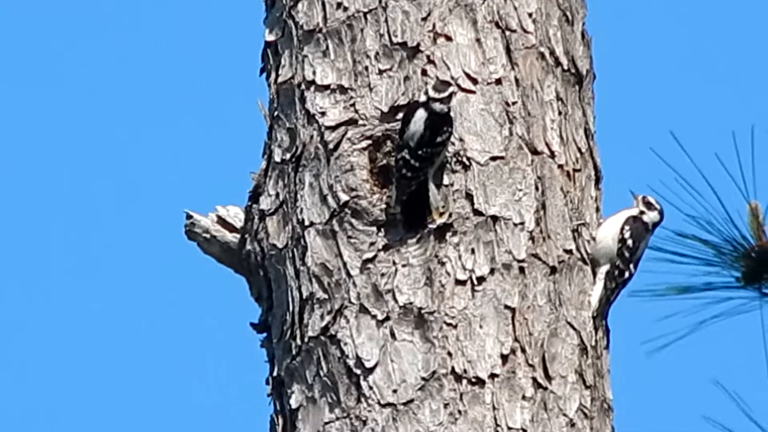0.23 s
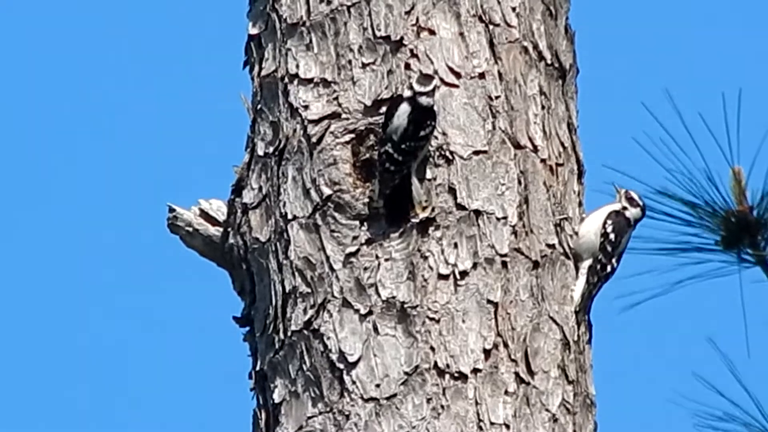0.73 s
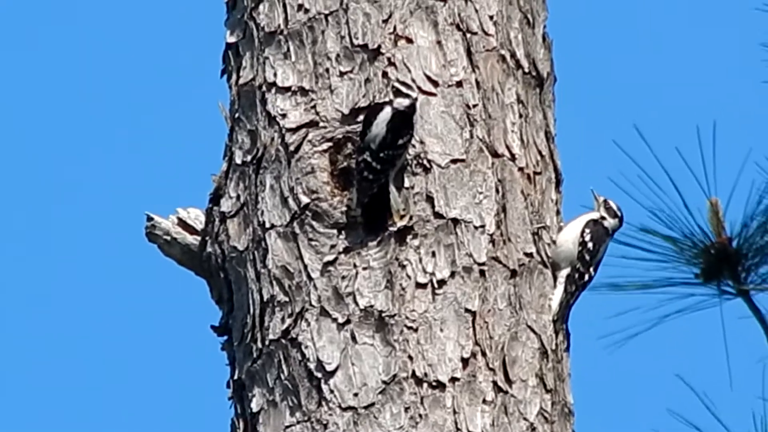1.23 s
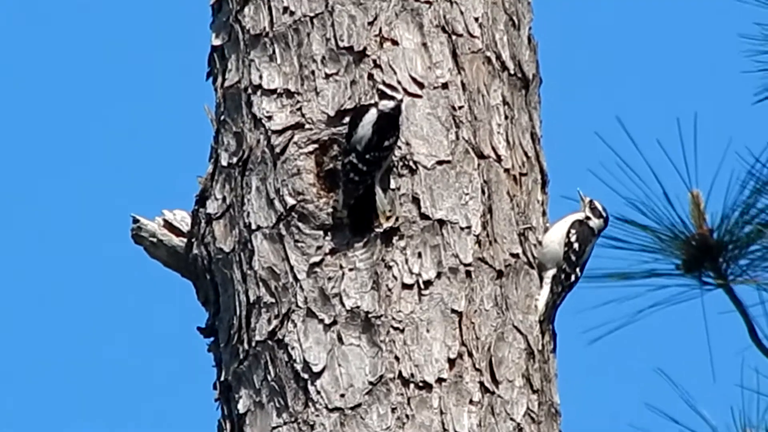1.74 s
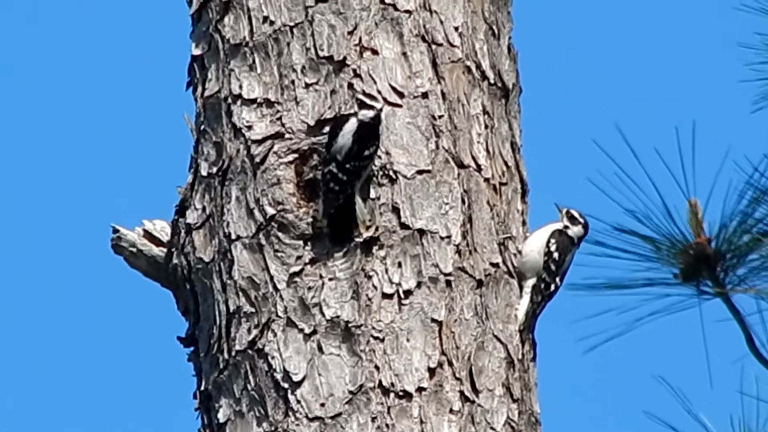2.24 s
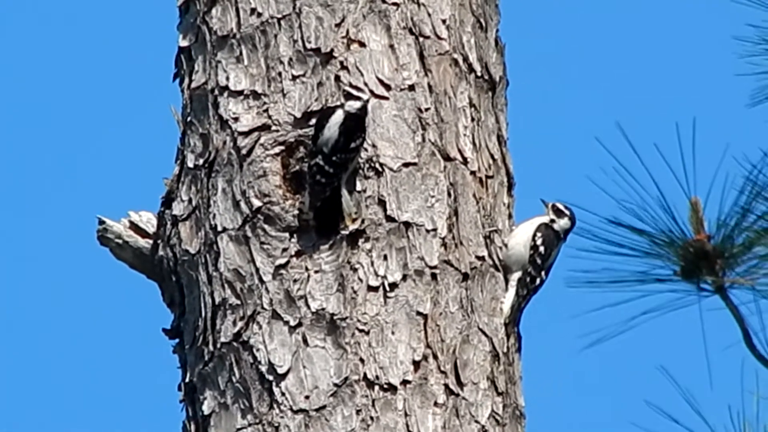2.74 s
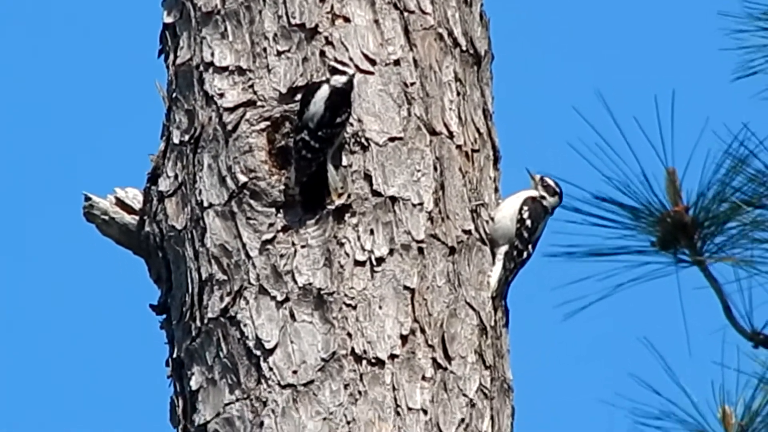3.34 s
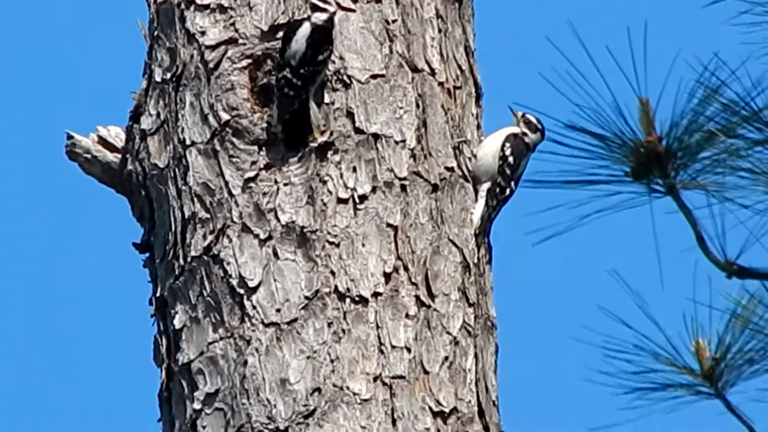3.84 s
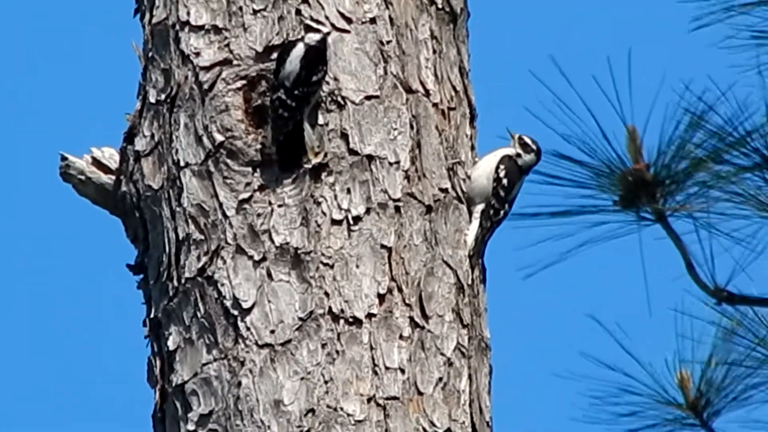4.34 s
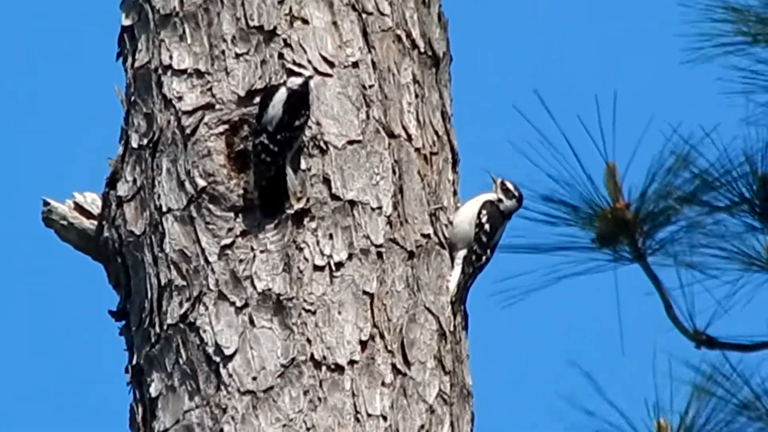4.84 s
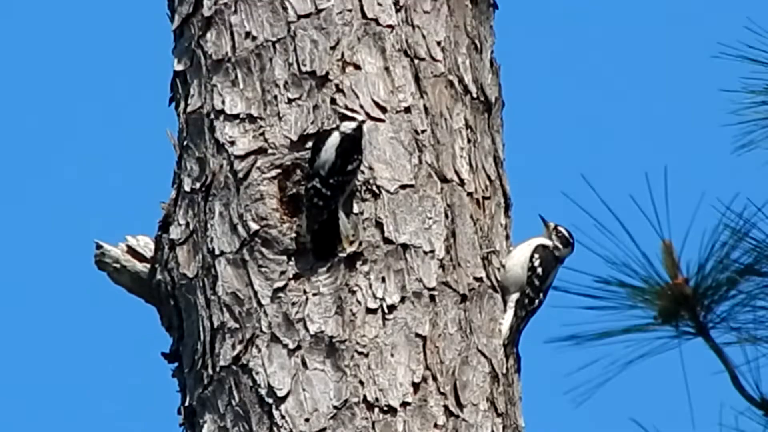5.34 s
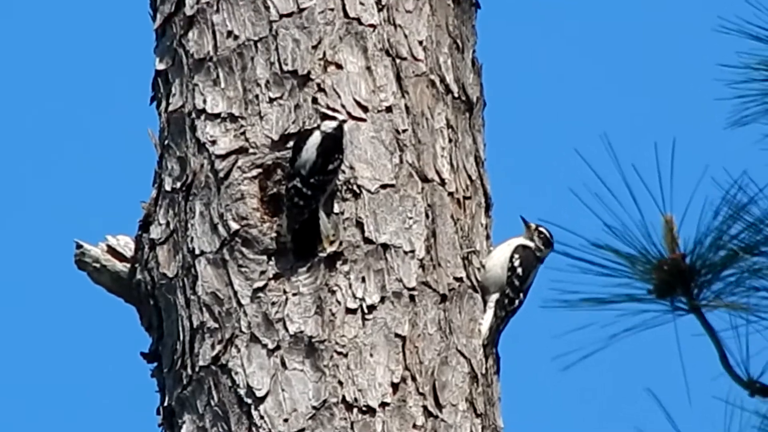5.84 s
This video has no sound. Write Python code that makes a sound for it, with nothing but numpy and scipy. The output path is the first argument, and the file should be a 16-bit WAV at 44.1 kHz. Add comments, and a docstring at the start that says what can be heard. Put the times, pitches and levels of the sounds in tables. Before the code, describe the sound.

Outdoors in a pine wood, a songbird sings three clear, steeply falling whistles about a second apart, then a quick, regular run of fourteen sharp descending chips. Fainter birds twitter and burr farther away, and a nearer one gives a brief two-note call after the run. Soft traffic rumble lies beneath, while low wind gusts thump the stereo microphone mostly on the left and leaves rustle faintly on the right.

```python
"""A songbird sings three falling whistles and a run of fast chips: gliding sines with weak overtones.
A second bird gives a two-note call; a far bird repeats a phrase, others give burry notes, and thin faint
whistles sound between, some of them echoes of the songbird's whistles. Dying noise tails scatter it all
through a pine wood. Lumpy low noise and short pulses are gusts at the microphone ports; grainy bright
noise is leaves on the right, with ticking twigs. A flickering noise bed is far traffic and far leaves."""
import sys
import numpy as np
from scipy import signal
from scipy.io import wavfile
from scipy.ndimage import uniform_filter1d

SR = 44100
rng = np.random.default_rng(int(sys.argv[2]) if len(sys.argv) > 2 else 0)


def transcribe(u):
    """Save the signal u as a 16-bit wav file named by the first command-line argument.

    u: samples, shape (n,) or (channels, n), limited to [-1, 1]; the rate is SR.
    q: integer samples, one column per channel.
    """
    v = np.clip(np.atleast_2d(u).T, -1, 1)
    q = np.round(v * 32767).astype(np.int16)
    wavfile.write(sys.argv[1], SR, q)


N = 267819

# The songbird. Pan is left minus right throughout.
# whistle contour: steep flick, shelf, loud drop, sagging tail [t/s from the drop, f/Hz, level/dB re top]
WHISTLE_SHAPE = [(-.187, 7800, -40), (-.182, 6400, -20), (-.177, 4400, -17), (-.17, 4040, -15.5),
                 (-.15, 3580, -10.5), (-.13, 3430, -5.5), (-.1, 3340, -15), (-.05, 3290, -10),
                 (-.03, 3220, -6), (.008, 2740, 0), (.035, 2310, -9), (.062, 2060, -12), (.11, 1960, -9),
                 (.2, 1790, -12.5), (.295, 1592, -16), (.32, 1540, -31)]
# each whistle [t/s of the drop, tail length factor, top level/dB, tail boost/dB, overtone boost/dB]
WHISTLES = [(.808, 1.3, -46, 1.5, -14), (1.732, 1.2, -38, -2.5, -3), (2.451, 1.04, -37.5, 1.5, -1)]
# chip contour [t/s from its mark, f/Hz, level/dB re top]
CHIP_SHAPE = [(-.005, 8720, -21), (-.0035, 8630, -18.5), (0, 6660, -17), (.003, 4980, -13.5),
              (.006, 4408, -25), (.012, 4214, -18.5), (.019, 4043, -26), (.023, 3854, -10.5),
              (.031, 3585, -4), (.039, 3258, -4), (.044, 2730, -4.5), (.048, 2162, -8), (.054, 1800, -14),
              (.061, 1597, -14.5), (.066, 1500, -33)]
# each chip [t/s of the mark, head length factor, top level/dB, pan/dB]
CHIPS = [(2.916, 0.95, -40, -2.0), (3.052, 0.91, -41, -2.7), (3.189, 0.94, -40, -1), (3.327, 0.98, -40, -2),
         (3.465, 0.97, -39.5, 3), (3.607, 0.84, -39.5, -2), (3.752, 0.88, -38, -3),
         (3.893, 0.83, -39, -3.5), (4.029, 0.92, -39, -3), (4.173, 0.94, -38.5, -4),
         (4.31, 0.97, -38, -3.5), (4.451, 0.99, -37, -2), (4.595, 0.94, -38, -3), (4.739, 0.98, -39.5, -5)]
# overtones the throat lets through [f/Hz, level/dB re fundamental]
THROAT = [(7000, -64), (7500, -25), (8100, -14.5), (8700, -24), (9300, -60), (11300, -54), (12100, -25),
          (13000, -59)]
# whistle pan by pitch [f/Hz, pan/dB]
WHISTLE_PAN = [(1600, 3), (2700, -4.5), (3500, -2.5), (8000, -18)]
TAIL_S, HEAD_S = .15, .035   # whistles stretch after this moment, chips before this one
THIRD_DB = -10.5   # the third multiple is weaker than the throat alone would make it
FLICK_SPREAD_DB = 3   # the flick above 4.5 kHz differs from chip to chip

# nearer bird's call, rising then falling note [t/s, f/Hz, level/dB before a fixed gain of 0.96]
CALL_RISE = [(5.255, 2270, -59), (5.285, 2200, -63), (5.295, 2116, -55), (5.315, 2400, -54),
             (5.335, 2600, -53), (5.352, 2676, -41.5), (5.366, 2790, -53.5), (5.378, 2844, -40),
             (5.384, 3770, -46), (5.389, 4930, -50)]
CALL_FALL = [(5.383, 3110, -54), (5.394, 2383, -54), (5.409, 2230, -43), (5.418, 2120, -55),
             (5.424, 1910, -60)]
# its overtones [f/Hz, level/dB re fundamental]
CALL_OVERTONES = [(4000, -18), (4600, -14), (5200, -22), (5700, -31), (7200, -30), (7900, -25), (8800, -26),
                  (9500, -60)]

# far bird's three-note phrase [t/s in phrase, length/s, start f/Hz, end f/Hz, level/dB re phrase]
PHRASE = [(0, .024, 3800, 2600, -5.5), (.042, .016, 2500, 3200, -1), (0.056, .02, 2550, 2950, -6)]
# each time it is sung [t/s, level/dB]
PHRASE_REPEATS = [(.288, -57), (.433, -54), (.583, -53), (.733, -54), (.883, -54)]
# thin faint whistles, some of them echoes of the songbird's whistles
# [t/s, length/s, start f/Hz, end f/Hz, level/dB, pan/dB]
FAINT_WHISTLES = [(1.173, 0.056, 3030, 2620, -64, 1), (1.22, 0.082, 2470, 2210, -64.5, -13),
                  (2.145, 0.15, 3340, 3300, -75, 0.1), (2.58, 0.039, 3405, 3350, -61, 7),
                  (2.662, 0.043, 3370, 3270, -63, 3), (5.073, .04, 1984, 2080, -67, -14),
                  (5.816, 0.047, 1924, 2080, -60, -9)]
# burry far notes, strings of tiny falling chirps [t/s, length/s, start f/Hz, end f/Hz, level/dB, pan/dB]
BURRY_NOTES = [(1.393, 0.049, 2540, 2080, -55, 3), (1.487, 0.036, 3400, 3070, -64, 9),
               (1.524, 0.043, 2550, 2030, -56, 3), (1.655, 0.05, 2520, 2010, -56.5, 6),
               (1.974, 0.054, 2550, 2345, -59, 2), (2.318, 0.063, 2620, 2080, -58, 7),
               (5.151, 0.087, 3040, 2520, -64.5, 14), (5.698, .09, 3090, 2800, -67, 11),
               (5.92, 0.07, 3050, 2660, -63.5, 15)]
BURR_S, BURR_HZ = 0.018, 252   # chirp spacing, half the sweep of one chirp

# scatter: decay time, level
BRANCH_T60_S, BRANCH_DB = 0.078, -3.5
WOOD_T60_S, WOOD_DB = .3, -9
FAR_T60_S, FAR_DB = 1.45, -8
FAINT_WET_DB = 5   # extra send of far birds and faint whistles into the scatter

# slow rise and fall of wind at the ports [t/s, left level/dB, right level/dB]
WIND_RISE_AND_FALL = [(0.09, -56, -66), (0.6, -53, -47), (1.2, -69, -68), (2.1, -56, -60), (2.45, -48, -42),
                      (2.9, -33, -46), (3.25, -33.5, -40), (3.6, -32.5, -36), (4.0, -26, -41),
                      (4.15, -49, -46), (4.5, -43.5, -54), (4.8, -43.5, -56), (5.0, -62, -65),
                      (5.6, -99, -70), (6.07, -46, -56)]
# buffets on top of it [t/s, half-length/s, peak level/dB, pan/dB]
BUFFETS = [(0.771, 0.028, -33.5, 20), (0.859, 0.042, -42.5, -20), (2.527, 0.021, -31.5, 16.5),
           (2.654, 0.033, -36.5, 9), (2.784, 0.024, -36, 24), (2.977, 0.029, -30, 12),
           (3.162, 0.032, -37.5, 11), (3.35, 0.035, -35, 19), (3.537, .035, -29, 4),
           (3.775, 0.054, -27.5, 10), (4.03, 0.033, -37, 13), (4.375, 0.063, -45.5, 17),
           (4.68, 0.095, -46.5, 24), (5.864, .06, -48, 12)]
# single eddies [t/s, pulse gain/dB, port: 0 left, 1 right]
EDDIES = [(0.793, -18.5, 0), (2.778, -18, 0), (3.019, -16.5, 0), (3.485, -5.5, 0), (3.691, -19.5, 1),
          (3.749, -25, 0), (3.865, -16.5, 0)]
# wind colour [f/Hz, level/dB per Hz]
WIND_COLOUR = [(20, -7), (55, 7.5), (110, -2.5), (170, -13.5), (260, -31), (400, -54)]

# leaves swelling with the breeze [t/s, level/dB before panning]
RUSTLE = [(0, -76.5), (1.5, -76.5), (2.3, -71), (2.9, -71.5), (3.5, -67.5), (3.9, -70), (4.2, -66.5),
          (4.6, -69), (4.8, -64.5), (4.9, -65), (4.97, -70.5), (5.7, -69.5), (6.07, -67.5)]
# rustle colour [f/Hz, level/dB per Hz]
RUSTLE_COLOUR = [(2500, 7.5), (5000, 4), (8000, 0), (11000, 6), (13500, -7), (15900, -32)]
# a branch shakes [t/s, peak level/dB before panning]
SHAKES = [(2.31, -71), (2.65, -73), (5.38, -65), (5.78, -69), (6.06, -64.5)]
SHAKE_S = 0.058   # half-length of a shake
# twig ticks [t/s, burst gain/dB before filter and panning]
TWIG_TICKS = [(4.893, -55), (5.546, -58.5), (5.777, -59), (5.93, -56.5)]

# colour of far traffic and far leaves [f/Hz, level/dB per Hz]
AIR_COLOUR = [(12, -66), (20, -13.5), (49, -2.5), (88, -2.5), (123, -1.5), (145, -7.5), (220, -9.5),
              (364, -14), (396, -15), (751, -17), (1940, -26.5), (2290, -26), (3580, -33.5), (10300, -44),
              (15700, -42.5)]
# pan of every noise bed by frequency [f/Hz, pan/dB]
AIR_PAN = [(100, 1), (1000, 1), (4000, 0), (12000, 0)]
# left-right likeness of the traffic bed [f/Hz, correlation from -1 to 1]
AIR_LIKENESS = [(60, 0.86), (130, 1), (300, 0.84), (640, 0.78), (1400, 0.42), (3100, -0.31), (6800, -0.23),
                (15000, 0.12)]
AIR_DB = -43.5

START_S, CUTOFF_HZ = 0.081, 15740   # end of the opening silence, top of the band


def amp(db):
    """dB to gain."""
    return 10 ** (np.asarray(db) / 20)


def sides(pan_db):
    """Left and right gains, half the pan up on one side and half down on the other."""
    return amp(np.array([pan_db / 2, -pan_db / 2]))


def rms_one(x):
    """Scale to rms 1."""
    return x / np.sqrt(np.mean(x ** 2) + 1e-20)


def in_time(rows):
    """Table columns as curves over all samples."""
    s, *columns = np.transpose(rows)
    return [np.interp(np.arange(N) / SR, s, c) for c in columns]


def at_hz(points, hz):
    """Read an [f/Hz, value] table on a log axis."""
    table = np.array(points)
    return np.interp(np.log(hz), np.log(table[:, 0]), table[:, 1])


def swell(s, half, db):
    """A bell-shaped swell of power."""
    return amp(db) ** 2 * np.exp(-2 * ((np.arange(N) / SR - s) / half) ** 2)


def drift(rate):
    """Random wander of rms 1: noise through two equal low-pass poles at rate Hz."""
    step = 40   # computed every 40 samples, then joined by lines
    r = np.exp(-2 * np.pi * step * rate / SR)
    noise = rng.standard_normal(N // step + 2002)
    slow = signal.lfilter([1], [1, -2 * r, r * r], noise)[2000:]
    return np.interp(np.arange(N) / step, np.arange(len(slow)), rms_one(slow))


def coloured(spectrum, flicker_db, likeness):
    """About half-octave bands of stereo noise with their own level, flicker and likeness; rms 1."""
    low, high = spectrum[0][0], spectrum[-1][0]
    edges = np.geomspace(low, min(high, 16500), int(2 * np.log2(high / low)) + 2)
    out, together, white = 0, drift(7.7), rng.standard_normal((2, 2, N))
    for k, (a, b) in enumerate(zip(edges, edges[1:])):
        band = signal.butter(2, [a, b], "band", fs=SR, output="sos")
        mid, side = signal.sosfilt(band, white[k % 2])   # neighbouring bands use different noise
        hz = np.sqrt(a * b)
        alike = np.clip(at_hz(likeness, hz), -1, 1)
        flicker = flicker_db * (together + 1.76 * drift(5.3))
        gain = amp(at_hz(spectrum, hz) + flicker) * sides(at_hz(AIR_PAN, hz))[:, None]
        out = out + gain * (np.sqrt(1 + alike) * mid + np.sqrt(1 - alike) * side * [[1], [-1]])
    return rms_one(out)


def no_overtones(hz):
    """Overtones so weak that the note is a plain sine."""
    return -90 + 0 * hz


def add_note(out, rows, pan, overtones=no_overtones, flutter=0.96, third_db=0):
    """Sing [t/s, f/Hz, level/dB] rows into out: a gliding sine, weak overtones, soft ends."""
    s, hz, db = np.transpose(rows)
    at = np.arange(int(s[0] * SR), min(int(s[-1] * SR), N))
    pitch = np.exp(np.interp(at / SR, s, np.log(hz)))
    level = np.interp(at / SR, s, db)
    # the syrinx rounds its bends
    pitch = uniform_filter1d(pitch, size=min(len(at) // 25 + 1, SR // 200), mode="nearest")
    phase = 2 * np.pi * np.cumsum(pitch) / SR
    tone = np.sin(phase)
    for k in range(2, 5):
        gain = amp(overtones(k * pitch) + third_db * (k == 3))
        tone = tone + gain * (k * pitch < SR / 2) * np.sin(k * phase)
    ends = np.clip(np.minimum(at - at[0], at[-1] - at) / (.002 * SR), 0, 1)
    loudness = np.sqrt(2) * amp(level) * ends * np.broadcast_to(flutter, N)[at]
    out[:, at] += loudness * tone * sides(pan(pitch))


def singer():
    """Whistles and chips of the songbird; moving air makes the level waver on the way."""
    out, waver = np.zeros((2, N)), amp(1.3 * drift(33.0) + 1.38 * drift(133.0))
    for drop, stretch, top_db, tail_db, overtone_db in WHISTLES:
        rows = [(drop + s + (stretch - 1) * max(s - TAIL_S, 0), hz, top_db + db + tail_db * (s > TAIL_S))
                for s, hz, db in WHISTLE_SHAPE]
        add_note(out, rows, lambda hz: at_hz(WHISTLE_PAN, hz),
                 lambda hz: at_hz(THROAT, hz) + overtone_db, waver, THIRD_DB)
    chance = rng.standard_normal((len(CHIPS), len(CHIP_SHAPE)))
    for (start, stretch, top_db, pan_db), draws in zip(CHIPS, chance):
        rows = [(start + s + (stretch - 1) * min(s, HEAD_S), hz,
                 top_db + db + FLICK_SPREAD_DB * draw * (hz > 4500))
                for (s, hz, db), draw in zip(CHIP_SHAPE, draws)]
        add_note(out, rows, lambda hz: pan_db + 0 * hz, lambda hz: at_hz(THROAT, hz), waver, THIRD_DB)
    return out


def near_caller():
    """The two-note call, gliding sines with overtones of their own."""
    out = np.zeros((2, N))
    for rows in (CALL_RISE, CALL_FALL):
        add_note(out, rows, lambda hz: -2.5 + 0 * hz, lambda hz: at_hz(CALL_OVERTONES, hz))
    return out


def arch(s, length, a, b, top_db, end_db):
    """Rows of a short glide from a to b Hz that swells and fades, its ends end_db below the top."""
    return [(s, a, top_db - end_db),
            (s + length / 2, (a + b) / 2, top_db),
            (s + length, b, top_db - end_db)]


def far_birds_and_faint_whistles():
    """The repeated phrase, faint whistles (some echo the songbird) and burry notes: wavering sine glides."""
    out, waver = np.zeros((2, N)), amp(2.0 * drift(62.0))
    for start, phrase_db in PHRASE_REPEATS:
        for s, length, a, b, db in PHRASE:
            rows = arch(start + s, length, a, b, phrase_db + db, 6)
            add_note(out, rows, lambda hz: 6 + 0 * hz, flutter=waver)
    out[1] *= -1   # flipped polarity: from far left the phrase is half a cycle late at the right port
    for s, length, a, b, db, pan_db in FAINT_WHISTLES:
        add_note(out, arch(s, length, a, b, db, 3.3), lambda hz: pan_db + 0 * hz, flutter=waver)
    for s, length, a, b, db, pan_db in BURRY_NOTES:
        for t in np.arange(0, length, BURR_S):
            centre = a + (b - a) * t / length
            swell_db = -5.0 * abs(2 * t / length - 1)
            rows = arch(s + t, BURR_S, centre + BURR_HZ, centre - BURR_HZ, db + swell_db, 7.7)
            add_note(out, rows, lambda hz: pan_db + 0 * hz, flutter=waver)
    return out


def wood(x):
    """Scatter off branches, near trunks and far wood: three dying noises, own in each ear, lumpy."""
    t, tail = np.arange(int(1.5 * SR)) / SR, 0
    trunks = amp(2.5 * np.array([drift(45), drift(45)])[:, :len(t)])   # lumps where trunks stand
    layers = ((BRANCH_T60_S, BRANCH_DB, .003), (WOOD_T60_S, WOOD_DB, .025), (FAR_T60_S, FAR_DB, .08))
    for t60, db, rise in layers:
        part = trunks * rng.standard_normal((2, len(t))) * amp(-60 * t / t60) * np.minimum(t / rise, 1)
        tail = tail + amp(db) * part / np.sqrt(np.sum(part ** 2, axis=1, keepdims=True))
    wet = signal.fftconvolve(x.mean(axis=0, keepdims=True), tail, axes=1)[:, :N]
    soak = signal.butter(1, 6000, fs=SR, output="sos")   # leaves soak up the treble
    return signal.sosfilt(soak, wet) * sides(-3.7)[:, None]


def wind():
    """Turbulence at the ports: lumpy low noise, own at each port, with buffets and single eddies."""
    lumps = amp(3.2 * np.array([drift(29.0), drift(26.0)]))
    power = amp(np.array(in_time(WIND_RISE_AND_FALL))) ** 2
    for s, half, db, pan_db in BUFFETS:
        power = power + swell(s, half, db) * sides(pan_db)[:, None] ** 2
    ports = np.sqrt(power) * rms_one(lumps * coloured(WIND_COLOUR, 1.36, [(20, 0.028), (400, 0)]))
    t = np.arange(-.02, .04, 1 / SR)
    eddy = np.cos(2 * np.pi * 95 * t + .5) * np.exp(-((t - .002) / 0.0034) ** 2)
    for s, db, port in EDDIES:
        i = int((s - .02) * SR)
        ports[int(port > .5), i:i + len(t)] += amp(db) * eddy
    return ports


def leaves():
    """Bright grainy noise for rustle and short noise bursts for twig ticks, mostly at the right."""
    power = amp(in_time(RUSTLE)[0]) ** 2 + sum(swell(s, SHAKE_S, db) for s, db in SHAKES)
    grain = amp(1.85 * drift(39.0))
    rustle = np.sqrt(power) * grain * coloured(RUSTLE_COLOUR, 0.64, [(2500, -0.0095), (15000, 0.39)])
    ticks, t = np.zeros(N), np.arange(SR // 50) / SR
    for s, db in TWIG_TICKS:
        ticks[int(s * SR):][:len(t)] += amp(db) * rng.standard_normal(len(t)) * np.exp(-t / 0.0079)
    ticks = signal.sosfilt(signal.butter(2, 5000, "high", fs=SR, output="sos"), ticks)
    return (rustle + ticks) * sides(-19.5)[:, None]


def traffic_and_far_leaves():
    """The background bed: one gently flickering noise, rumble at the bottom and faint hiss on top."""
    return amp(AIR_DB) * coloured(AIR_COLOUR, 0.68, AIR_LIKENESS)


def scene():
    """All sources in the wood; far birds and faint whistles reach the ear more by scatter."""
    near, faint = singer() + near_caller(), far_birds_and_faint_whistles()
    send = near + amp(FAINT_WET_DB) * faint[0]   # only the left side of the faint layer feeds the scatter
    birds = near + faint + wood(send)
    return birds + wind() + leaves() + traffic_and_far_leaves()


def record(dry):
    """Sound opens after a short silence; a steep low-pass cuts the top."""
    opened = dry * np.clip((np.arange(N) / SR - START_S) / 0.0047, 0, 1)
    return signal.sosfilt(signal.ellip(14, .5, 70, CUTOFF_HZ, fs=SR, output="sos"), opened)


dry = scene()
out = record(dry)
transcribe(out)
```